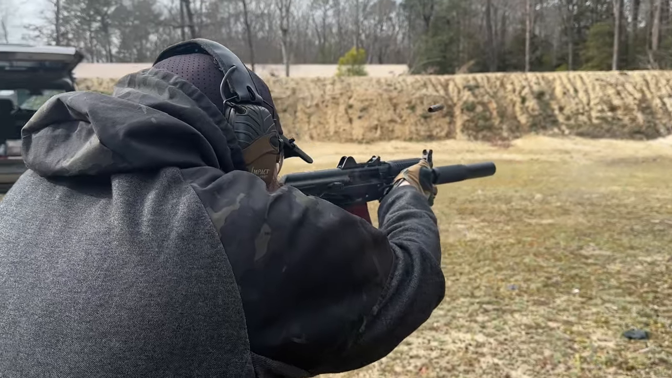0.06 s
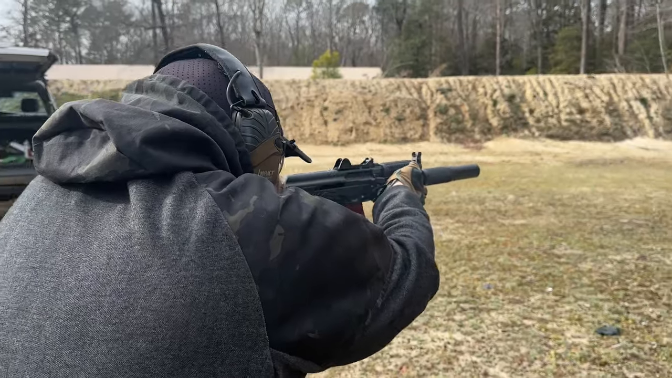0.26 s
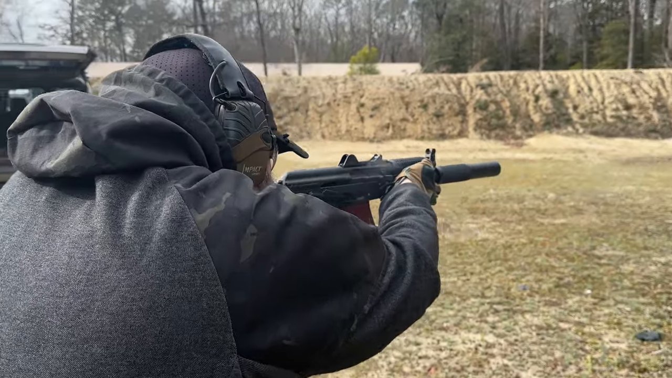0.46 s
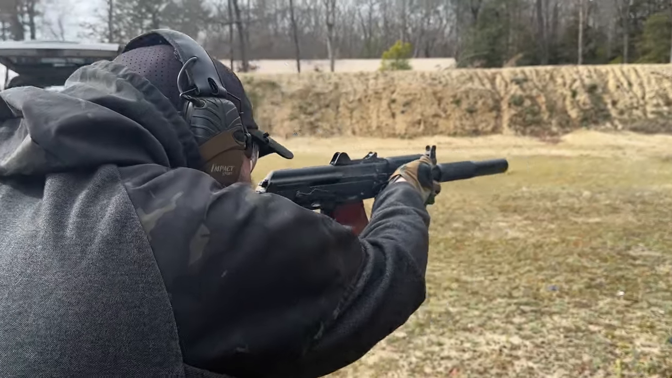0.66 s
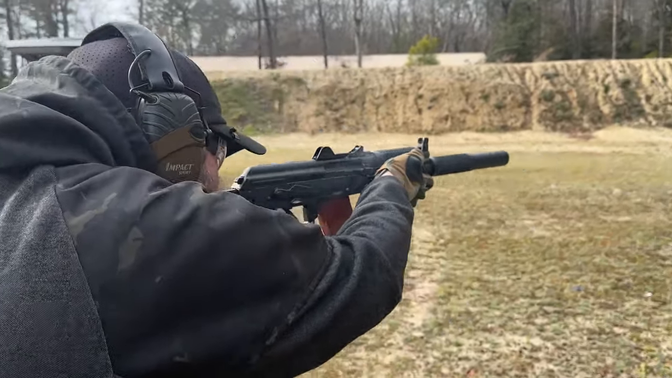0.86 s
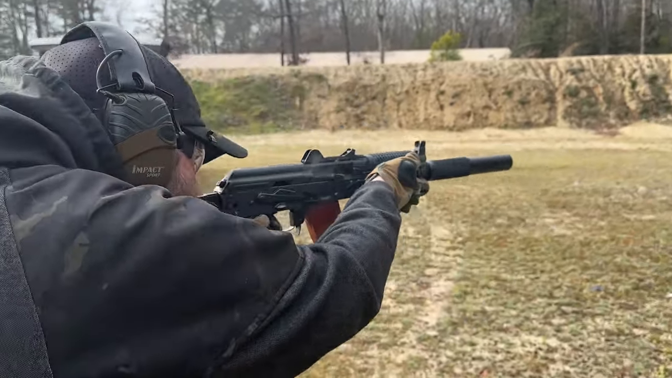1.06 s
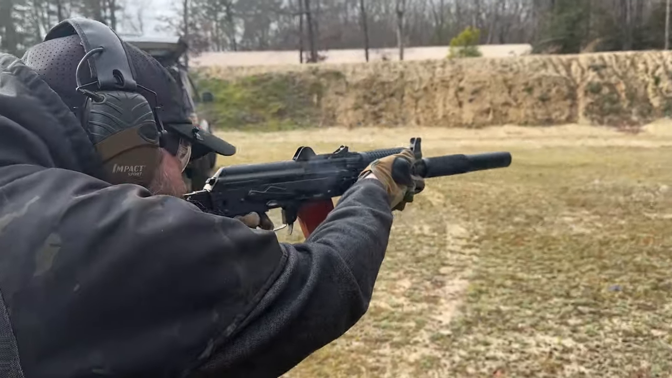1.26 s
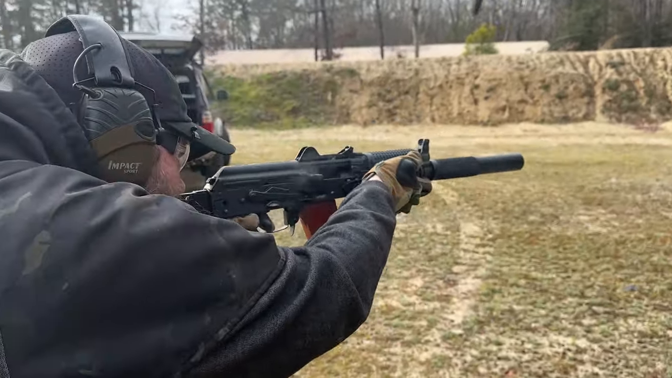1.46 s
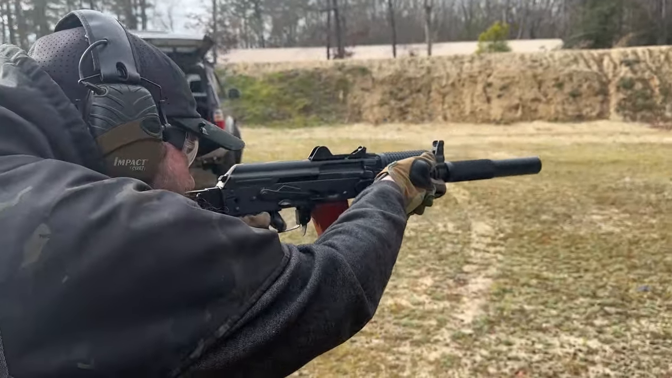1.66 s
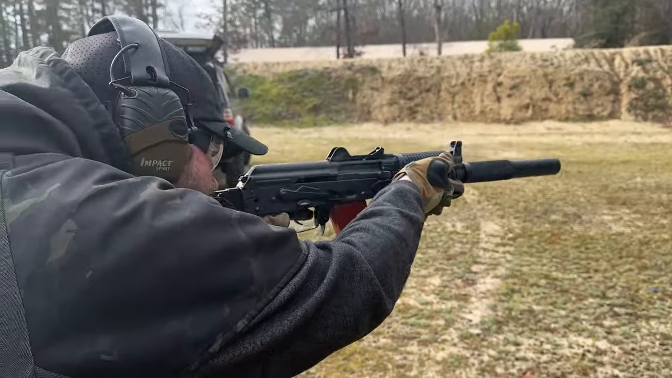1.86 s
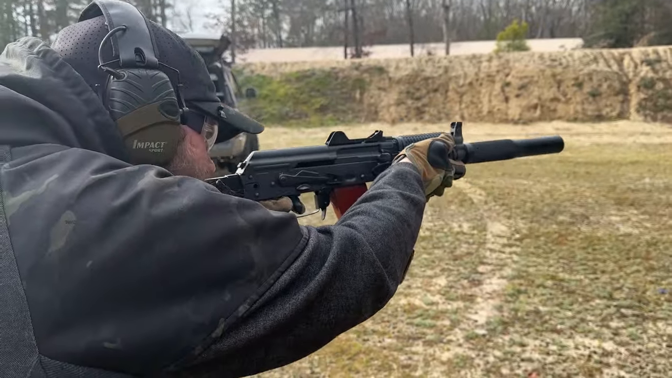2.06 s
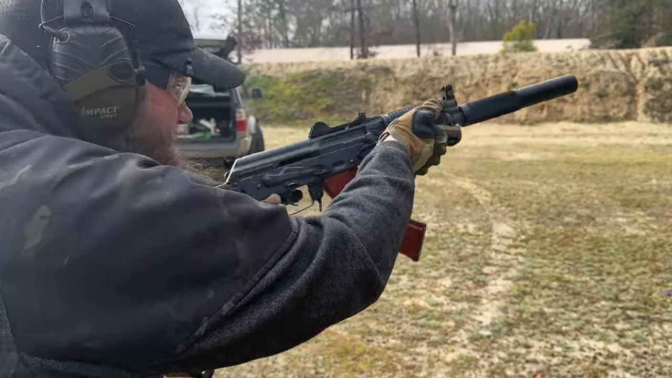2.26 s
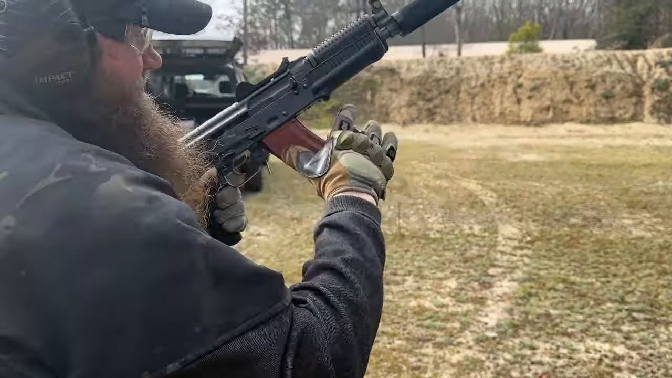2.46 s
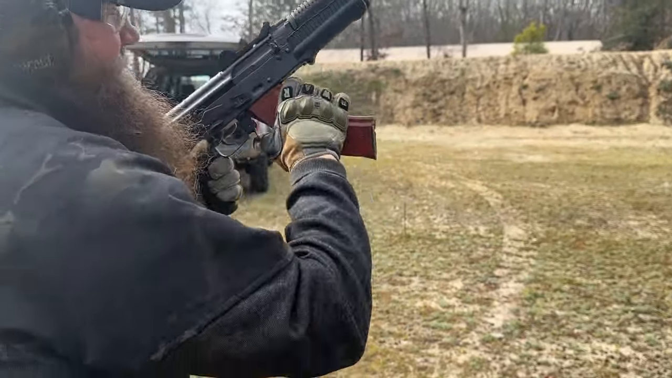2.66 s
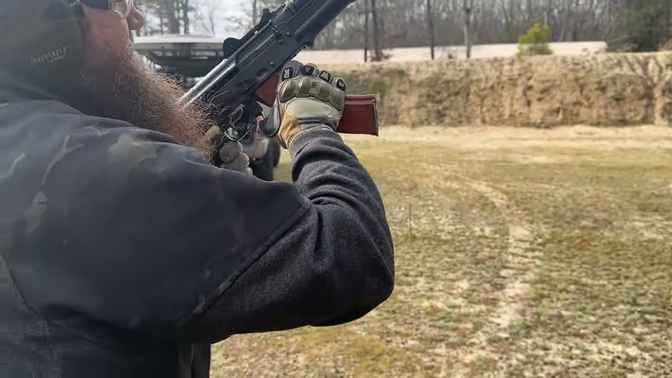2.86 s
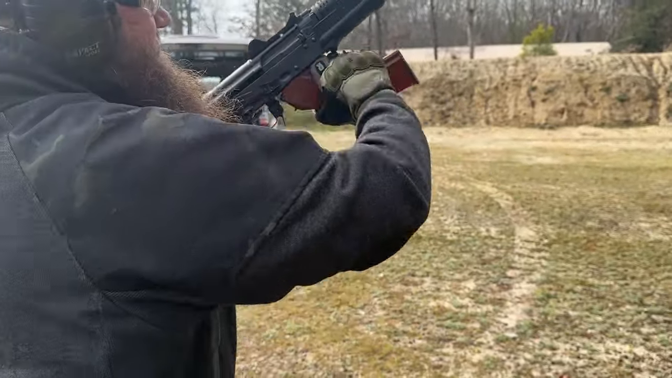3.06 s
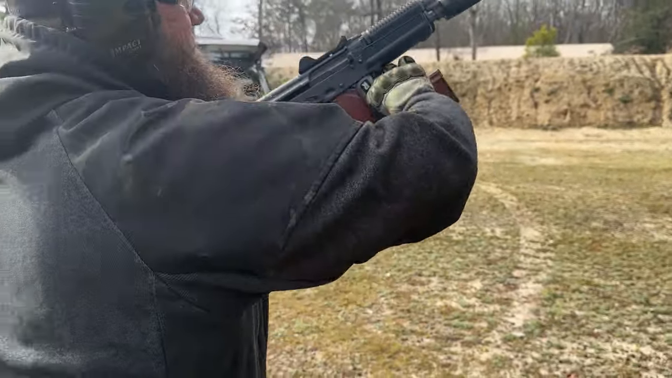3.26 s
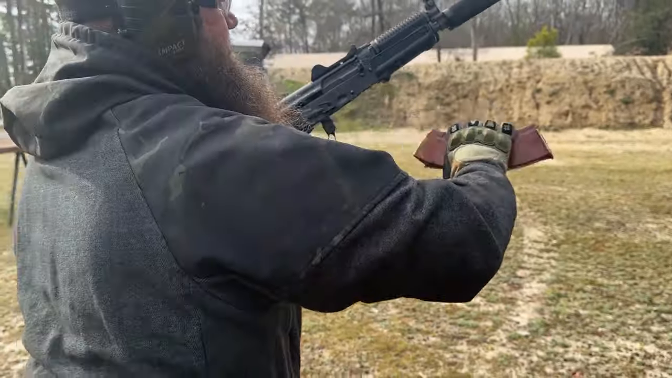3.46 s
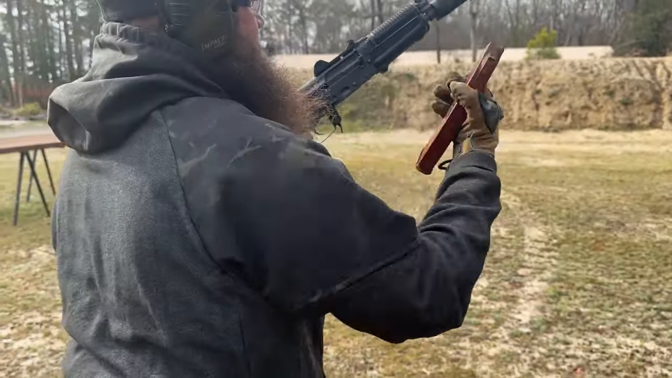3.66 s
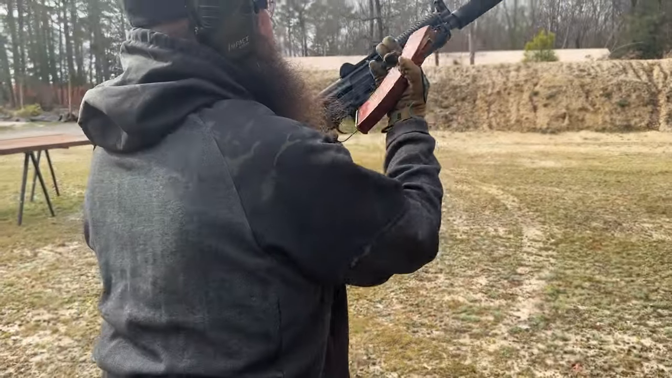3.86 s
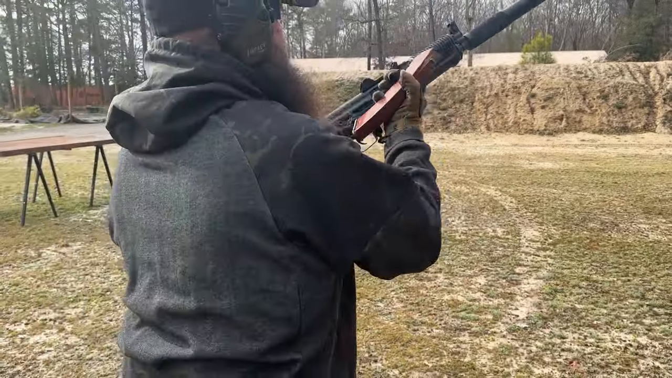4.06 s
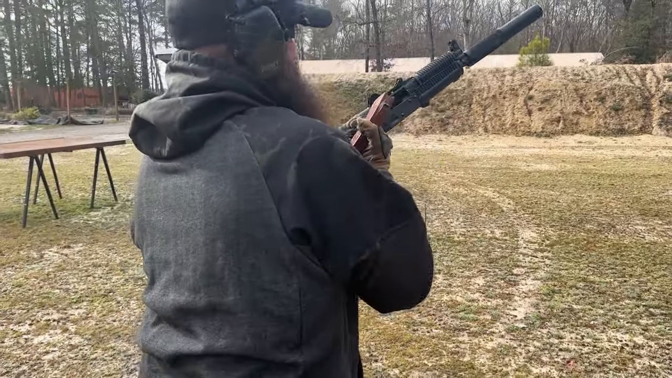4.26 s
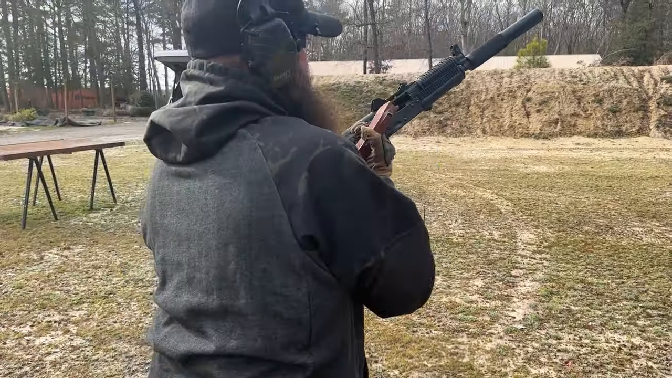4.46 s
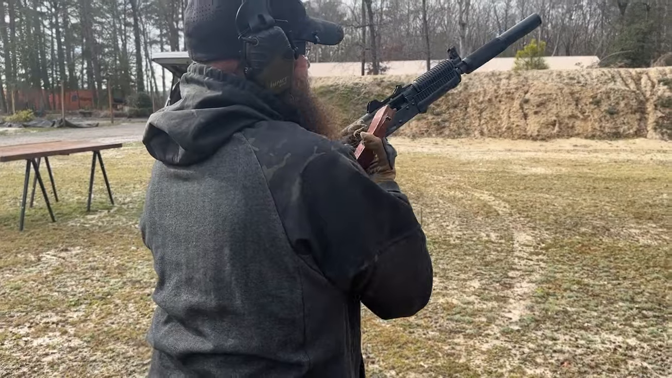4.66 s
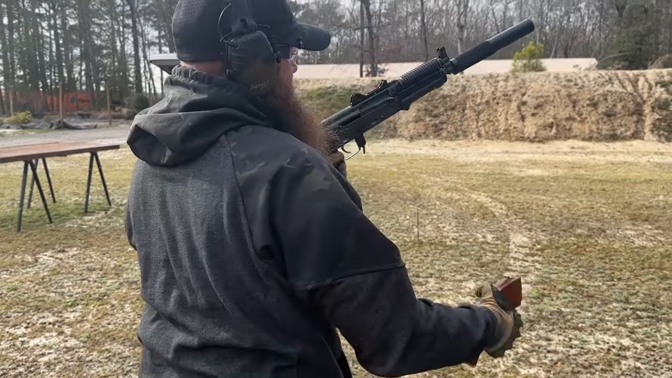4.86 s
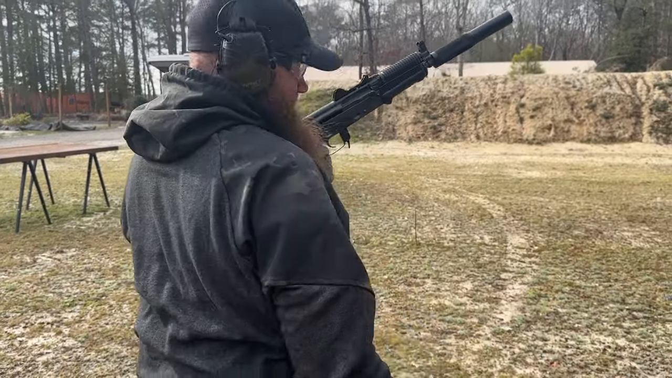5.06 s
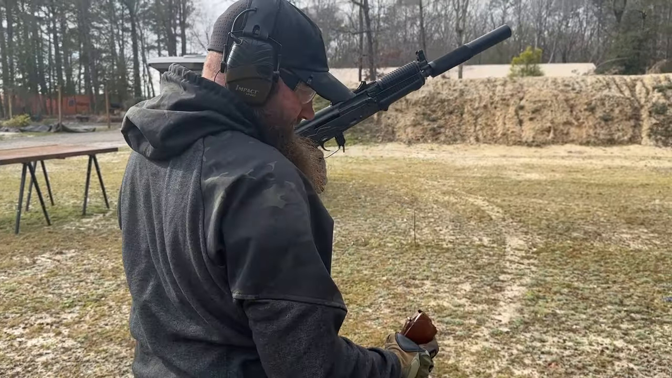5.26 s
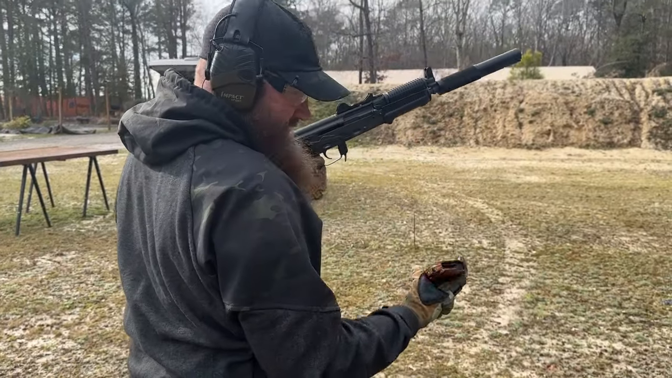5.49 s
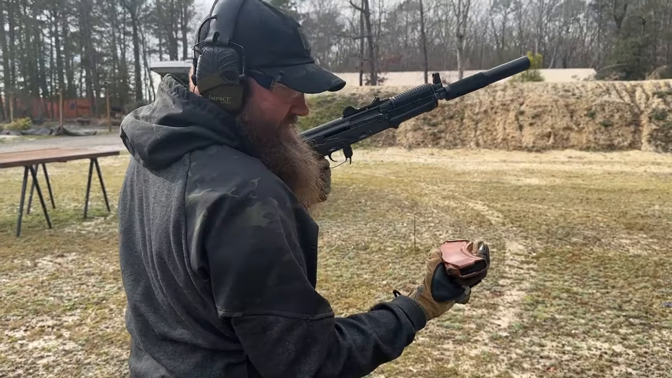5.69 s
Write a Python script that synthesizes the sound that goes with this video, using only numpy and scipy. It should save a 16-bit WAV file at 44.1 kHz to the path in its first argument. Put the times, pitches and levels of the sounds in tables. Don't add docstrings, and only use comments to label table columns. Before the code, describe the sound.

Close, distorted outdoor sound: a suppressed rifle fires eight fast shots in about a second and a half, each a thick blast with clacking bolt and gassy chirp. Spent cases tick brightly. A dull roar rolls back from bank and woods and fades under a sharp magazine knock, then two gritty metallic rattles ending in hard clacks, with faint cloth rustle.

```python
import sys
import numpy as np
from scipy import signal
from scipy.fft import rfft, irfft
from scipy.io import wavfile
from scipy.ndimage import uniform_filter1d

SR = 44100
rng = np.random.default_rng(int(sys.argv[2]) if len(sys.argv) > 2 else 0)


def unload_audio(sound):
    columns = np.transpose(np.atleast_2d(sound))
    steps = np.round(np.clip(columns, -1, 1) * 32767)
    wavfile.write(sys.argv[1], SR, steps.astype(np.int16))


def ratio(d):
    e = np.asarray(d, float) / 20
    return 10 ** e


N = 252648


def evened(x):
    return x / np.sqrt(np.mean(x ** 2) + 1e-20)


def read(f, value, hz):
    return np.interp(np.log(hz + 1), np.log(np.asarray(f) + 1), value)


def add(mix, s, sound):
    at = round(s * SR)
    part = mix[max(at, 0):][:len(sound) + min(at, 0)]
    part += sound[max(-at, 0):][:len(part)]


def resonate(x, hz, width):
    return signal.lfilter(*signal.iirpeak(hz, hz / width, SR), x)


def noise(size, hz, octaves):
    f = np.fft.rfftfreq(size, 1 / SR) + 1
    bell = np.exp(-(np.log2(f / hz) / octaves) ** 2 / 2)
    colour = bell * np.sqrt(hz / f)
    return evened(irfft(rfft(rng.standard_normal(size)) * colour, size))


def strike(size, rise, t60):
    t = np.arange(size) / SR
    return (1 - np.exp(-t / abs(rise))) * ratio(-60 * t / abs(t60))


def ring(modes, size):
    t = np.arange(size) / SR
    return sum(ratio(db - 60 * t / t60) * np.sin(2 * np.pi * (hz * t + rng.random())) for hz, db, t60 in modes)


def field(power):
    a, b = rng.standard_normal((*power.T.shape, 2)).T
    return signal.istft((a + 1j * b) * np.sqrt(power), nperseg=512, noverlap=384)[1][:N]


# t/s, blast level/dB
SHOTS = [(-.007, -3.5), (0.1868, -4), (0.3843, -5), (0.6041, -3), (0.7725, -6), (1.0144, -6.5),
         (1.2055, -5.5), (1.4253, -4)]
# delay t/s, level/dB, t60/s, centre f/Hz, width/octaves
CYCLE = [(0, 13.5, 0.065, 5000, 2.6), (.004, 11, 0.13, 1000, 1.12), (.018, 9.5, 0.19, 4000, 3.1),
         (.025, 5.5, 0.066, 7035, 3.9), (.062, 9, .1, 1352, 0.78), (0.063, 5, .08, 4500, 1.4),
         (.075, 11, .1, 3500, 1.9), (.088, 6, 0.064, 4413, 1.6), (0.021, -6.5, 0.36, 69.9, 1.4)]
# f/Hz, level/dB, t60/s
BOLT = [(2715, -11, 0.27), (3490, -3.5, 0.051), (4650, -13, 0.23), (6610, -17, 0.17), (7900, -10.5, 0.07)]
# delay t/s, level/dB, f/Hz, t60/s
BOOMS = [(.041, 13, 480, .08), (.051, 13, 350, .08), (.044, 5, 200, .1), (.101, 14, 410, .07),
         (.121, 13, 400, .07), (.105, 5, 200, .12), (.131, 10, 310, .09), (.155, 8, 590, .09),
         (.09, -4, 60, .12), (.03, -6, 75, .12)]


def rifle():
    out = np.zeros(N)
    for s, shot_db in SHOTS:
        for delay, db, t60, hz, octaves in CYCLE:
            rise = min(5.5 / hz, 0.012)
            add(out, s + delay, ratio(shot_db + db) * noise(16384, hz, octaves) * strike(16384, rise, t60))
        for delay, db in ((.025, 2.5), (.065, 1.5)):
            add(out, s + delay, ratio(shot_db + db) * ring(BOLT, size=8192))
        for delay, db, hz, t60 in BOOMS:
            a, b, c = rng.standard_normal(3)
            delay, db, hz = delay + .004 * a, db + 2.5 * b, hz * (1 + .08 * c)
            boom = ring([(hz, db, t60)], size=8192) * strike(8192, .005, 9.0)
            add(out, s + delay, ratio(shot_db - 2.5) * boom)
    return out


# delay t/s, level/dB, first f/Hz, last f/Hz, length/s
WHISTLE = [(.002, 2, 860, 1250, .04), (.066, -1, 1250, 1650, .035), (.115, 1, 950, 760, .035),
           (.135, -3, 430, 620, .035)]


def whistles():
    out = np.zeros(N)
    for s, shot_db in SHOTS:
        for delay, db, first_hz, last_hz, length in WHISTLE:
            hz = np.linspace(first_hz, last_hz, round(length * SR)) * rng.uniform(.92, 1.08)
            hz *= 1 + .09 * evened(uniform_filter1d(rng.standard_normal(len(hz)), 120))
            tone = np.sin(2 * np.pi * (np.cumsum(hz) / SR + rng.random()))
            add(out, s + delay, ratio(shot_db + db) * tone * signal.windows.tukey(len(hz), .5))
    return out


# t/s, peak level/dB, ring f/Hz
CASES = [(0.3193, 5, 5350), (0.5354, 7, 5060), (0.7424, 5.5, 4600), (0.9277, 8.5, 4750),
         (1.1625, 7.5, 5340), (1.364, 4.5, 5380), (1.5816, 6, 7790), (1.6286, 12, 7300),
         (1.6436, -2.5, 5350), (1.7882, -11.5, 5320), (1.816, -26, 4730), (1.853, -32.5, 4550),
         (1.9873, -13, 6970), (2.024, -38.5, 4520), (2.0534, -43.5, 4640), (2.2122, -10, 5370),
         (2.2674, -40, 4500), (2.3324, -42, 6870), (2.3544, -41.5, 5260), (2.404, -39, 5600),
         (2.5224, -38, 7330)]


def cases():
    out = np.zeros(N)
    for s, db, hz in CASES:
        t60 = .045 + .0005 * db
        tick = noise(4096, 6500, 1.8) * strike(4096, 0.00081, 0.49 * t60)
        add(out, s, ratio(db - 4) * (tick + ring([(hz, -17, t60)], size=4096)))
    return out


# t/s, peak level/dB, main ring f/Hz, treble level/dB
TAPS = [(2.2122, -14, 2746, -11), (2.2125, -14, 3700, -17), (2.492, -6.5, 1644, -27.5),
        (2.51, -27, 1690, -11.5), (2.519, -29, 1500, -10.5), (2.565, -45, 1080, -24),
        (2.756, -36, 1500, -15), (2.879, -27.5, 1367, -32), (2.916, -37.5, 1800, -17),
        (3.033, -18.5, 1787, -21.5), (3.0399, -1.5, 1447, -18), (3.046, -6.5, 1703, 10),
        (3.122, -37, 1560, -17), (3.188, -42, 980, -14), (3.339, -26.5, 1123, -36),
        (3.345, -17.5, 1300, -32), (3.354, -18.5, 1400, -28), (3.372, -33.5, 1900, -15),
        (3.385, -35, 1300, -18), (3.912, -38, 3000, -11.5), (4.032, -40.5, 1560, -11),
        (4.256, -41, 1310, 3.5), (4.308, -46.5, 1152, -0.5), (5.188, -40.5, 1150, -37),
        (5.544, -48, 2557, -25)]
# t/s, peak level/dB, main ring f/Hz, treble level/dB
RATTLES = [(4.057, -28, 1256, -15), (4.071, -9, 2160, -6), (4.077, -5, 2190, -3), (4.082, -6, 2100, -4),
           (4.094, -8, 1484, -2.5), (4.1, -12, 1300, -6), (4.1075, -6, 1700, -2.5),
           (4.114, -5.5, 1390, -16), (4.13, -1, 1530, -3), (4.136, -6, 3100, -2), (4.1436, 2.5, 1300, 1),
           (4.677, -34.5, 2030, -39), (4.686, -17.5, 3490, -22.5), (4.693, -20.5, 1600, -22),
           (4.702, -4.5, 1412, -6), (4.709, -13, 1300, -12), (4.716, -17, 1500, -14),
           (4.726, -7, 1740, -15.5), (4.731, -8, 1750, -9), (4.737, -8, 3600, -7),
           (4.744, 3.5, 1653, -16.5), (4.757, -7, 1713, -4.5), (4.765, 3, 3200, -1.5),
           (4.769, 2, 2100, -3.5), (4.775, 4, 2716, 3), (4.805, -17, 3482, -18.5)]
# f/Hz, width/Hz, level/dB
RECEIVER = [(1205, 290, -1.5), (1818, 400, 4), (2020, 94, -14.5), (2740, 116, -7), (3121, 220, 3),
            (4600, 640, -5.5)]
# f/Hz, level/dB, t60/s
RINGS = [(2100, -17.5, .2), (3500, 5.5, 0.16), (4630, -7, .16), (5070, -3.5, .09), (7420, -13, .12)]
# t/s, level/dB
RING_HITS = [
    (3.046, -46),
    (4.148, -33),
    (4.779, -26.5),
]
SINGING = 4.78, [(2164, -62, 1.2), (2606, -56, 2.0), (3187, -62, 1.0), (3289, -43, 1.05)]


def knocks():
    out = np.zeros(N)
    t60 = .037
    clean = .55
    for s, db, hz, treble_db in TAPS + RATTLES:
        share_db = 1.5 + .4 * treble_db
        drive = rng.standard_normal(4096)
        main = evened(resonate(resonate(drive, hz, 450), hz, 450))
        tone = np.sin(2 * np.pi * hz * np.arange(4096) / SR)
        main = evened((1 - clean / 2) * main + clean * tone)
        steel = evened(sum(ratio(g) * resonate(resonate(drive, f, 1.2 * w), f, 4.2 * w) for f, w, g in RECEIVER))
        body = (main + ratio(share_db) * steel) * strike(4096, 0.00038, t60)
        crack_shape = strike(4096, .0003, .6 * t60) + ratio(-26) * strike(4096, .003, .09)
        crack = noise(4096, 8000, .8) * crack_shape
        add(out, s, ratio(db - 4) * (body + ratio(treble_db) * crack))
    scatter = noise(32768, 1600, 1.7)
    scatter = scatter * (strike(32768, 0.0018, 0.15) + ratio(-24.5) * strike(32768, .03, 1.34))
    rough = .6 * out + 1.07 * abs(out) * noise(N, 2200, 1.2)
    out = out + ratio(-58) * signal.fftconvolve(rough, scatter)[:N]
    for s, db in RING_HITS:
        add(out, s, ratio(db) * ring(RINGS, size=16384))
    start, tones = SINGING
    add(out, start, ring(tones, size=SR) * strike(SR, .16, 99.))
    return out


# start t/s, seated t/s, level/dB
SLIDES = [
    (4.06, 4.151, -13),
    (4.69, 4.772, -10.5),
]
# t/s after seating, level/dB
SLIDE_STOP = [(.02, -27), (.07, -59)]


def slides():
    t = np.arange(N) / SR
    after, stop_db = np.transpose(SLIDE_STOP)
    level = 0
    for s, seat, db in SLIDES:
        swell_db = np.interp(t, [s, seat, *(seat + after)], [-29, 0, *stop_db], -150, -150)
        level = level + ratio(db + swell_db)
    grit = ratio(5.0 * evened(uniform_filter1d(rng.standard_normal(N), 60)))
    return level * evened(grit * noise(N, 5000, 1.22))


# t/s, level/dB, width/s, pull (-1) or push (1)
THUDS = [(3.04, -33, .0016, -1), (3.0505, -30, .003, 1), (4.146, -21.5, .003, 1), (4.7742, -16, .002, -1),
         (4.7805, -12.5, .0042, 1)]


def thuds():
    t = np.arange(N) / SR
    return sum(way * ratio(db) * np.exp(-((t - s) / width) ** 2) for s, db, width, way in THUDS)


# t/s, level/dB, f/Hz, t60/s
JINGLES = [(2.216, -45, 5250, .2), (2.566, -59, 5600, .25), (2.918, -53, 5900, .12), (2.98, -56, 5700, .1),
           (2.92, -49, 2300, .1), (3.38, -62, 5600, .25), (4.2, -67, 10800, .3), (3.07, -71, 4600, 4.0),
           (3.06, -74, 11000, 5.0)]


def jingles():
    out = np.zeros(N)
    for s, db, hz, t60 in JINGLES:
        add(out, s, ratio(db) * noise(32768, hz, 0.07) * strike(32768, 0.0032, t60))
    return out


CREAK = 5.5, .085, -53, 1380, 2100


def creak():
    s, length, db, low_hz, top_hz = CREAK
    arch = np.sin(np.pi * np.clip((np.arange(N) / SR - s) / length, 0, 1))
    fuzz = evened(1.1 + resonate(rng.standard_normal(N), 150, 300) * 9)
    hz = low_hz + (top_hz - low_hz) * arch ** 2
    return ratio(db) * arch ** 2 * fuzz * np.sin(2 * np.pi * np.cumsum(hz) / SR)


# t/s, level/dB
MOVES = [(2.2, -67.5), (2.33, -69), (2.52, -67), (3.04, -59), (2.92, -71), (3.4, -65.5), (3.65, -72),
         (3.89, -66.5), (4.23, -61.5), (4.86, -58.5), (5.6, -80)]


def rustle():
    chance = rng.random(N) < 500 / SR
    size = ratio(2 * 3.5 * np.minimum(rng.exponential(1, N), 5)) * chance
    grains = np.sqrt(.02 + abs(signal.oaconvolve(size, strike(1024, .0004, .02))[:N]))
    t = np.arange(N) / SR
    level = ratio(-91)
    for s, db in MOVES:
        level = level + ratio(db + np.minimum(110 * (t - s), 80 * (s - t)))
    return level * evened(grains * noise(N, 8600, 1.0))


SLEEVE = 3.7, 0.25, -58.5


def sleeve():
    s, width, db = SLEEVE
    return ratio(db) * np.exp(-((np.arange(N) / SR - s) / width) ** 2) * noise(N, 1400, 1.1)


# f/Hz, early level/dB per Hz, early t60/s, late level/dB per Hz, late t60/s
ECHO = [(30, -42, .45, -59, 4.2), (120, -34, 0.85, -49, 2.2), (486, -31, 1.44, -44.5, 3.42),
        (1000, -36, 1.71, -52, 3.48), (1800, -30.5, 0.47, -44.5, 2.11), (3000, -37.5, 0.48, -49.5, 1.46),
        (5000, -50.5, 0.6, -71, 1.8), (16000, -60, 0.45, -87.5, 1.1)]
# f/Hz, level/dB per Hz
AIR = [(15, -38), (25, 0.5), (127, 4.5), (300, -8.5), (600, -8.5), (2000, -18), (4030, -27.5),
       (16000, -47.5)]


def outdoors():
    hz, t = np.fft.rfftfreq(512, 1 / SR), np.arange(N // 128 + 5) * 128 / SR
    f, *curves = np.transpose(ECHO)
    early_db, early, late_db, late = (read(f, c, hz)[:, None] for c in curves)
    echo = 0
    for s, db in SHOTS[1:]:
        age = np.maximum(t - s - .1, 0)
        decay = ratio(early_db - 60 * age / early) ** 2 + ratio(late_db - 60 * age / late) ** 2
        echo = echo + ratio(2 * db) * decay * (1 - np.exp(-age / 0.005)) ** 2
    patches = rng.standard_normal((len(t), len(hz))).T
    patches = evened(uniform_filter1d(uniform_filter1d(patches, 8, 0), 9, 1))
    roar = field(echo * ratio(2 * (22 + 1.1 * patches)))
    air_db = read(*np.transpose(AIR), hz)[:, None] + 2.1 * patches[::-1]
    air = evened(field(ratio(2 * air_db)))
    return roar + ratio(-58.5) * air


def scene():
    handling = knocks() + slides() + jingles() + creak() + rustle() + sleeve()
    return (rifle() + whistles() + outdoors() + cases() + handling)[None]


# f/Hz, width/Hz, level/dB
PORT = [(2300, 450, -5.5), (3064, 800, 3), (4000, 440, -3.5)]
# start t/s, end t/s
GAP = (.0685, .2062)


def microphone(dry):
    ceiling = ratio(-2.9)
    drive = dry / ceiling
    for hz, width, db in PORT:
        drive = drive + (ratio(db) - 1) * resonate(drive, hz, width)
    flat = ceiling * drive / (1 + abs(drive) ** 4) ** (1 / 4) + thuds()
    t = np.arange(N) / SR
    start, end = GAP
    flat = flat * np.interp(t, [start - .0012, start, end, end], [ratio(-4.6), 0, 0, 1])
    flat = signal.lfilter(*signal.butter(1, 28, "high", fs=SR), flat)
    flat = flat - 0.11 * resonate(flat, 15000, 7000)
    lowpass = signal.firwin(127, 15600, window=("kaiser", 8), fs=SR)
    return signal.oaconvolve(flat, lowpass[None], "same")


def top_cut(x):
    return signal.sosfilt(signal.butter(12, 16460, fs=SR, output="sos"), x)


def record(dry):
    mix = microphone(dry)
    return top_cut(mix)


dry = scene()
out = record(dry)
unload_audio(out)
```